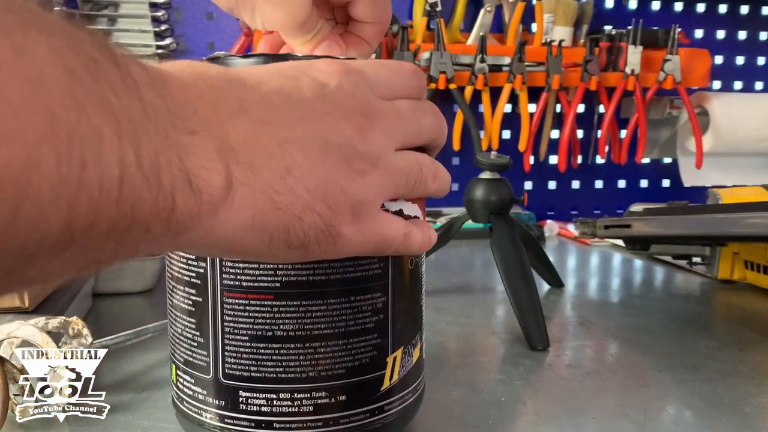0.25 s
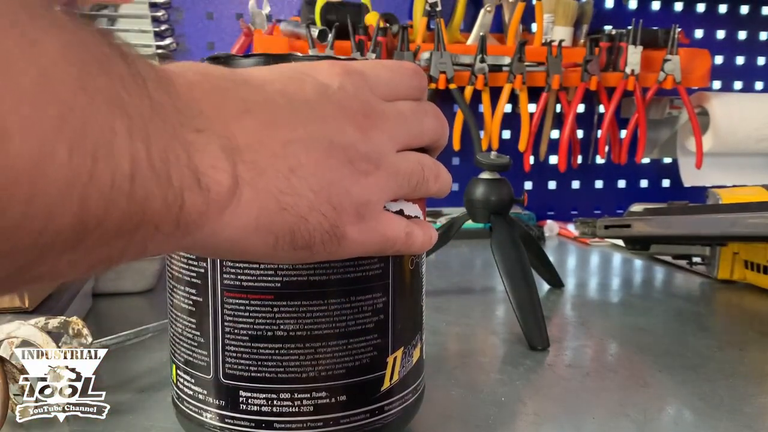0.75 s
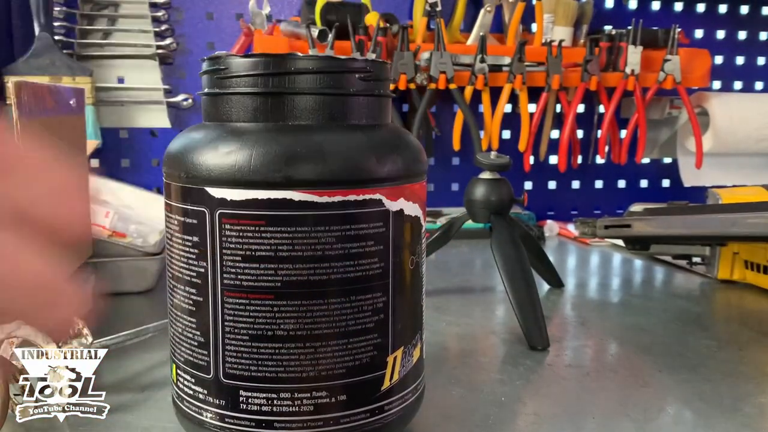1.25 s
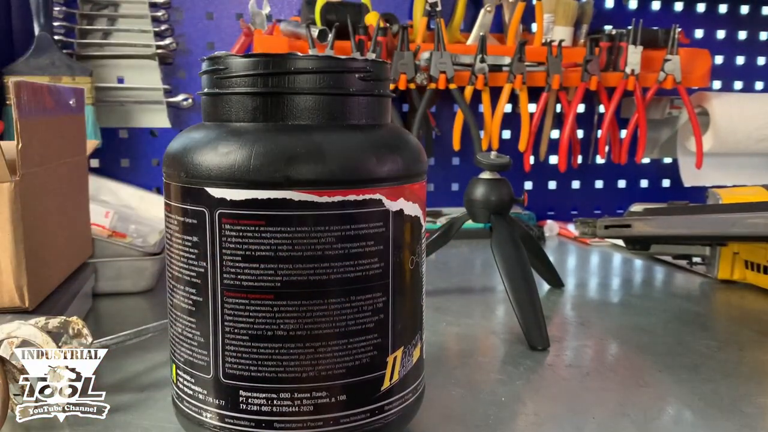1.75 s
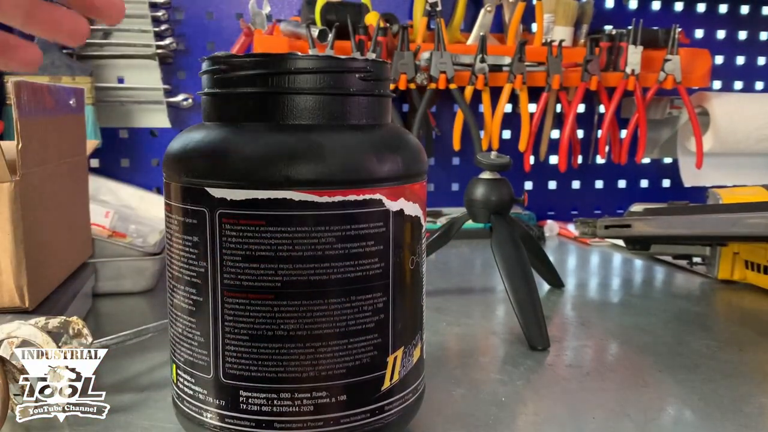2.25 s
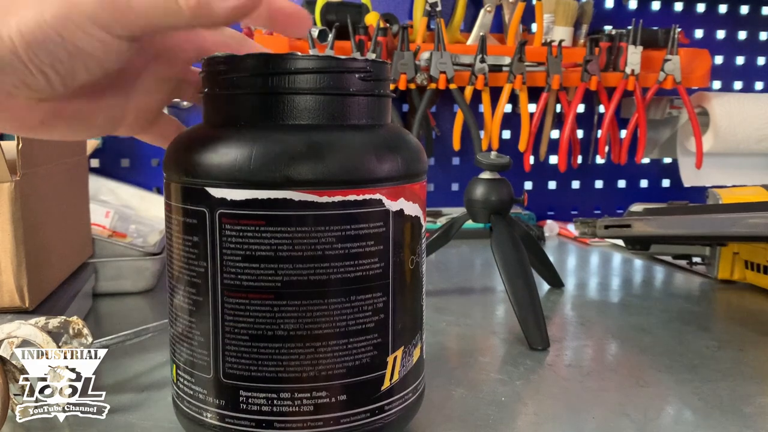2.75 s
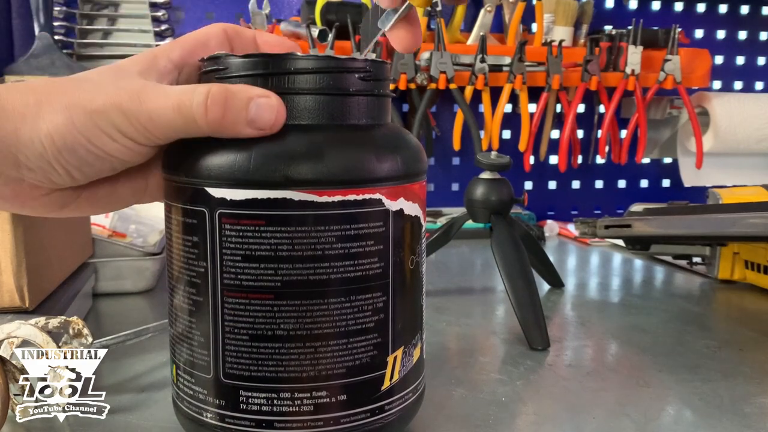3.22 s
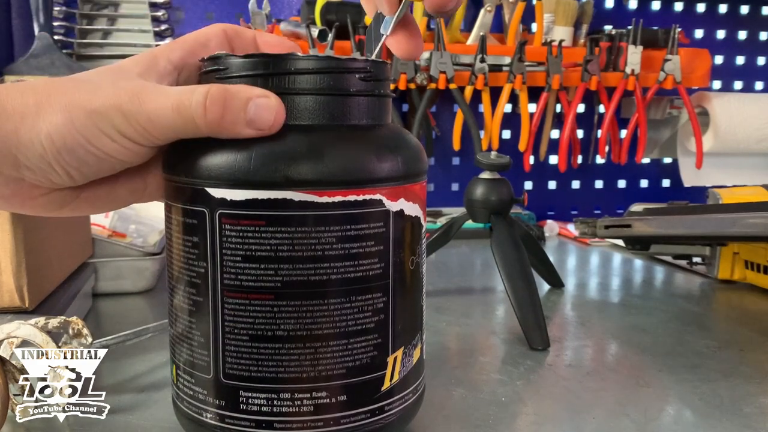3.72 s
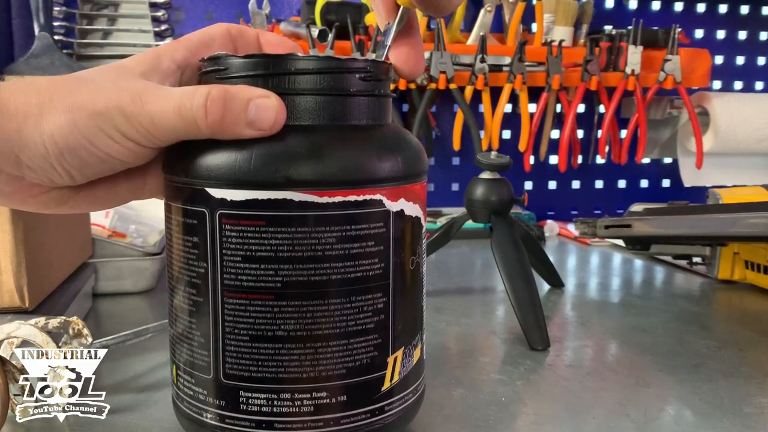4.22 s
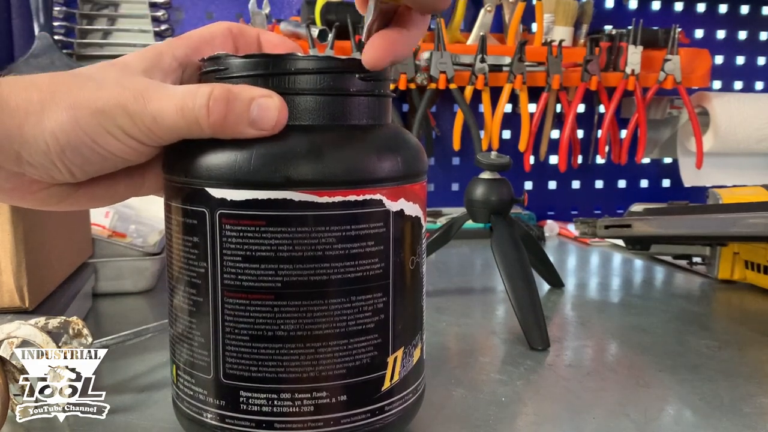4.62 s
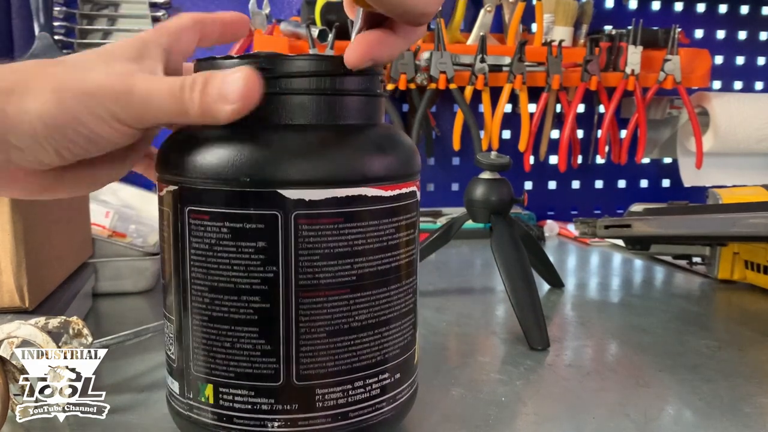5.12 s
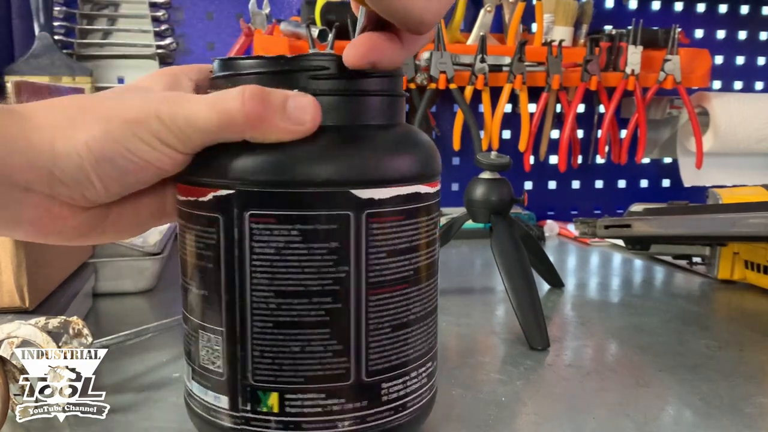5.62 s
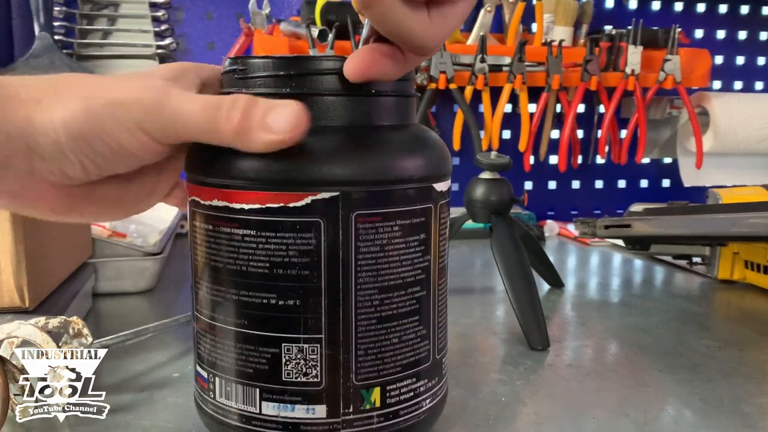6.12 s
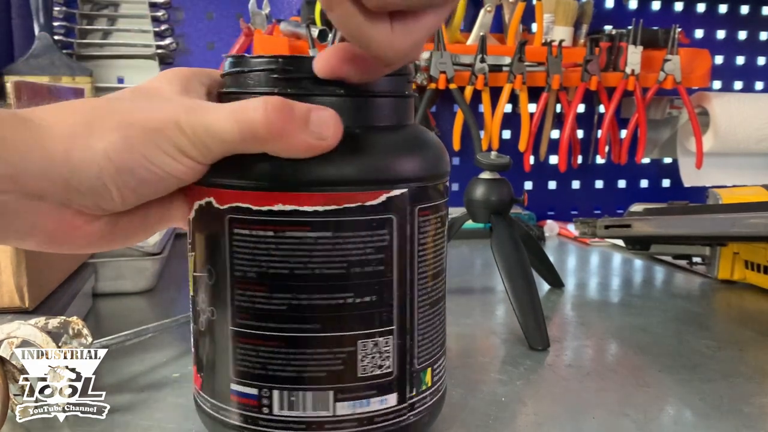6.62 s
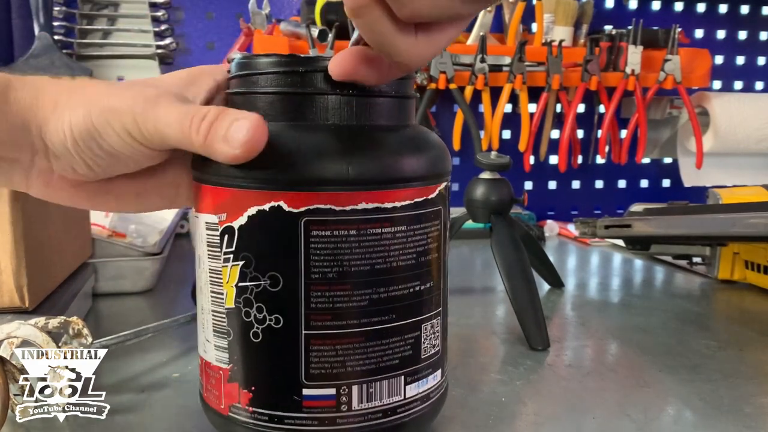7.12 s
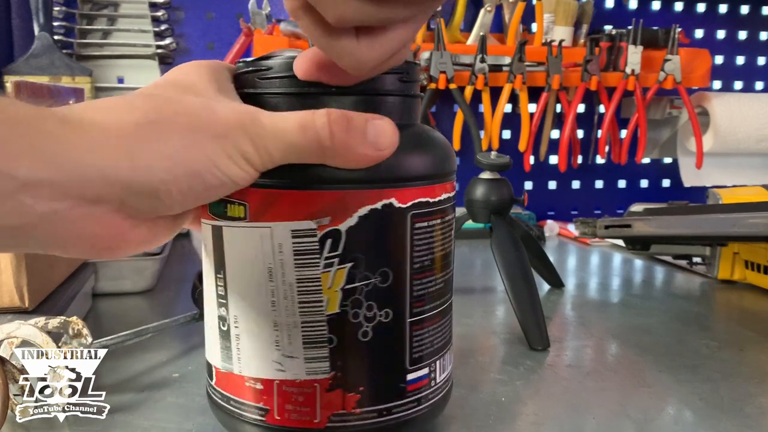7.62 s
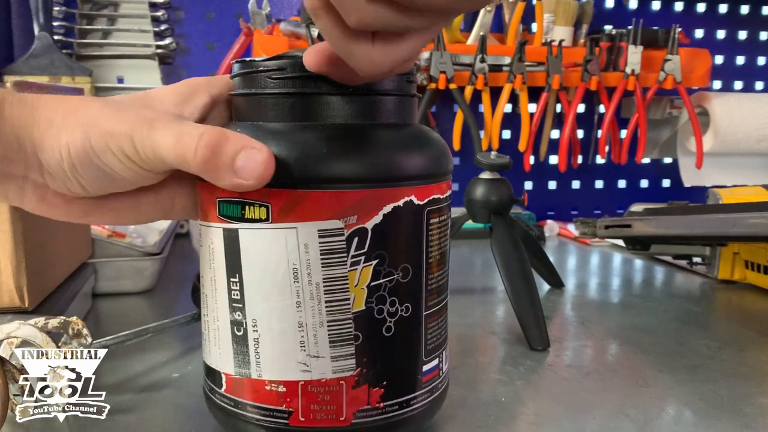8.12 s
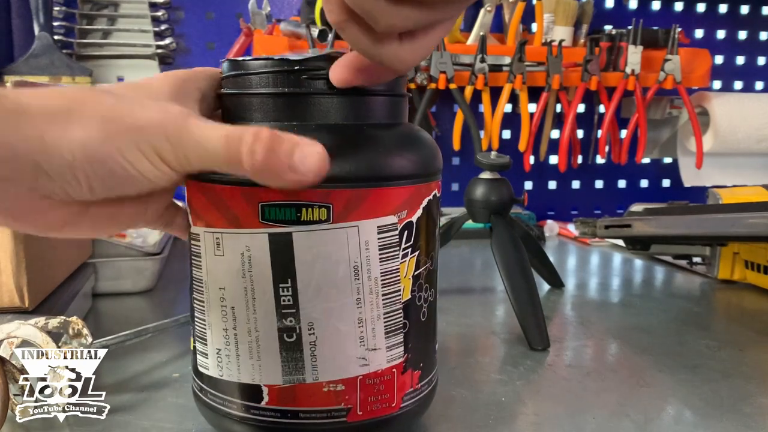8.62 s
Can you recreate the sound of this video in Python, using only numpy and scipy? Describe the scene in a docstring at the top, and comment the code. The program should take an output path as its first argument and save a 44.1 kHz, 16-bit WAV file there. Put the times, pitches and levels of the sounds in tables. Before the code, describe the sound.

Close up in a small workshop, a lid gives two short scraping twists with hollow plastic clacks. After light hand rubbing, a snap-off knife ratchets out in crisp, uneven clicks. The tip taps and pierces a tight foil seal, then drags in crackly, stop-start tears while the empty-sounding jar knocks softly as it turns. Brief room echoes and faint hiss.

```python
"""Opening a sealed plastic jar

In a small workshop, a lid is twisted off a large plastic jar, and a snap-off knife clicks out notch by notch.
The blade pierces the foil seal and is dragged round the rim while the hollow jar knocks as it is turned.
Cuts are clumps of tiny noisy tears, scrapes are shaped noise, and blows and clicks are dying tones with noise.
Echoes, a faint hiss and a low rumble surround them.
"""
import sys
import numpy as np
from scipy import signal
from scipy.fft import rfft, irfft, next_fast_len
from scipy.io import wavfile
from scipy.ndimage import uniform_filter1d

SR = 44100
rng = np.random.default_rng(int(sys.argv[2]) if len(sys.argv) > 2 else 0)


def bounce(signal):
    """Save signal as a 16-bit WAV file at the path given by the first command-line argument."""
    frames = np.transpose(np.atleast_2d(signal))
    limited = np.clip(frames, -1, 1)
    pcm = np.round(limited * 32767).astype(np.int16)
    wavfile.write(sys.argv[1], SR, pcm)


N = 390726  # length in samples
SIZE = next_fast_len(N, True)  # working length, a little longer for fast transforms
TIME, HZ = np.arange(SIZE) / SR, np.fft.rfftfreq(SIZE, 1 / SR)

# Pushes of the blade through the foil. Each row: start in seconds, length in seconds, base level in dB,
# swell from start to end in dB, brightness in dB, extra hollow sound of the jar in dB.
CUTS = [(3.004, 0.11, -54, 1.5, 3.5, -2.5), (3.483, 0.016, -64.5, 15, -4, 24),
        (3.648, .012, -63, 5.5, 1, 0), (3.783, 0.023, -46, 36, 1.5, -1.5),
        (3.817, 0.037, -36, -2, -4.5, 10), (4.026, 0.032, -63.5, -5.5, -7.5, 18),
        (4.153, 0.031, -62, -3, -6.5, 6.5), (4.306, 0.046, -39.5, -14, 0.5, 1),
        (4.38, .049, -57.5, 9, -5, 2), (4.419, 0.052, -45, 0.5, -2.5, -3),
        (4.505, 0.041, -49.5, 17.5, -4, -11), (4.583, 0.081, -53.5, 10, 0, -10),
        (4.652, 0.091, -52, -2, -3, -2), (4.719, 0.1, -44.5, 4, -2, 1.5), (4.841, 0.15, -44, 1, -2.5, 2.5),
        (4.991, 0.12, -60.5, 2, 7, 9), (5.14, .071, -63, -9, -2.5, -4), (5.198, 0.06, -46, -7.5, -4.5, 5),
        (5.328, 0.063, -46.5, 13.5, -4.5, 7), (5.452, .05, -47.5, 9, -1, -5), (5.479, 0.11, -47, -3, -3, 4),
        (5.56, 0.12, -49, -16, -2.5, 3.5), (5.649, 0.11, -41.5, 8.5, -2, -2),
        (5.774, 0.17, -47.5, -15, 0.5, 5), (6.242, 0.11, -63, -16, 1, 10.5), (6.318, 0.1, -47.5, 5, 0, -4),
        (6.43, .06, -41.5, 4.5, -1, -2.5), (6.49, 0.094, -48.5, 0, 1, -1), (6.54, 0.15, -41, 9.5, -2, 2),
        (6.685, 0.097, -42, 1.5, 0, -3), (6.836, 0.063, -54.5, 10, 2, 3), (7.147, 0.027, -51, -6, -1.5, 7),
        (7.239, .076, -48.5, 18, -3, 1), (7.327, 0.067, -42.5, 0, -4.5, 6),
        (7.403, 0.2, -49, 8, -0.5, -1.5), (7.518, 0.11, -41, -2, -2.5, 0.5), (7.621, 0.18, -57, -23, 1, -4),
        (8.072, .09, -51, 14.5, -1.5, 4), (8.147, 0.27, -53, -3, -1, 2), (8.24, 0.1, -62, -11, 9, 6),
        (8.579, .095, -44.5, -13, -1, 5.5), (8.677, .064, -57, -6, -2.5, 8.5), (8.834, .038, -49, 1, -2, 7)]
# Scrapes of the lid round its thread. Each row: start in seconds, length in seconds, base level in dB,
# swell in dB, brightness in dB.
TWISTS = [(0.41, 0.058, -62, 7.5, -1.5), (0.455, 0.11, -47.5, 4, 3.5), (0.5, 0.16, -42.5, 3.5, -1.5),
          (0.92, 0.03, -61.5, 4, 2), (0.965, 0.049, -50.5, 17, -1), (1.005, 0.18, -51.5, -10, -5)]
# Light rubbing of hands and knife. Each row: start in seconds, length in seconds, base level in dB,
# swell in dB, brightness in dB.
RUBS = [(1.418, 0.03, -59.5, -1, -11), (1.449, 0.064, -46.5, -21, 1), (1.56, 0.23, -67.5, -4, -3),
        (1.797, 0.089, -63, -10, 1), (2.2, 0.11, -48.5, -4.5, 7.5), (2.3, 0.16, -49.5, 2.5, -0.5),
        (2.53, 0.06, -57, 0, 3.5), (2.63, 0.15, -62, -8, -7.5), (2.803, 0.099, -57, -2, -11),
        (2.868, 0.11, -57.5, -13.5, 7), (2.93, 0.04, -60.5, -2, -13), (3.035, 0.093, -60.5, -1, -8.5),
        (3.15, 0.039, -65.5, 0, -3.5), (3.21, 0.04, -68, 2.5, 0.5), (5.72, 0.12, -50, 2, -9),
        (5.95, 0.19, -58, 0.5, 2.5), (6.16, 0.066, -57, -4, 2.5), (6.58, 0.17, -53.5, 2, 2),
        (6.92, 0.2, -54.5, 4.5, -2), (7.29, 0.1, -51.5, -1, -3), (8.1, 0.049, -51.5, -2.5, -3),
        (7.79, 0.098, -66.5, -8.5, 4.5), (7.963, 0.051, -62, -2, -0.5)]
# Bands of cuts and scrapes: fizz, rasp, seal, hollow. Each row: lower edge in Hz, upper edge in Hz.
STROKE_BANDS = [(6500, 16000), (1350, 6500), (560, 1350), (110, 560)]
# Colour of the cut. Each row: frequency in Hz, relative level in dB per Hz.
CUT_COLOUR = [(110, -0.5), (190, -2), (270, 6), (370, -4.5), (550, -3), (760, -1.5), (1100, -3),
              (1500, 1.5), (2200, 10.5), (3100, 8), (4400, 2.5), (5600, -7), (6800, -5.5), (8500, -8.5),
              (11000, -13.5), (14000, -12), (16000, -11)]
# Colour of plastic sliding on plastic or skin. Each row: frequency in Hz, relative level in dB per Hz.
SCRAPE_COLOUR = [(110, -1), (270, 3.5), (550, -2), (900, -5.5), (1400, -2.5), (2300, 8), (3100, 6),
                 (4300, 5.5), (5600, -7.5), (6800, -5), (8500, -7), (11000, -13), (14000, -9),
                 (16000, -12.5)]
# The seal's own resonance, shifting as its free edge grows. Each row: time in seconds, frequency in Hz,
# height in dB.
SEAL_RESONANCE = [(4.298, 753, 7), (4.44, 736, 12), (4.7, 722, 11.5), (4.85, 736, 6.5), (4.979, 730, 2.5),
                  (5.35, 820, 6.5), (5.522, 694, 10.5), (5.622, 697, -3), (5.669, 1256, -8.5),
                  (5.75, 1283, 7), (5.83, 1090, 9), (6.199, 1087, 10.5), (6.459, 1044, 10.5),
                  (6.67, 928, 4), (6.801, 990, 4), (7.349, 850, 6.5), (7.6, 1025, 4), (8.141, 976, 4),
                  (8.86, 920, 7.5)]
# How far the bending sheet's resonances come and go. Each row: frequency in Hz, typical change in dB.
FLEX_DB = [(300, 2), (750, 1), (1500, 1.4), (4500, 2), (8000, 1.3)]

# Snaps of foil and plastic. Each row: time in seconds, treble level in dB before the final lift,
# ring of the sheet in dB against the treble before a shift for each band, note of the sheet in Hz.
SNAPS = [(0.535, -52.5, 18, 1700), (0.578, -43, 5, 3360), (0.591, -49.5, 12.5, 1820),
         (0.651, -55, -17, 3970), (0.995, -49.5, -0.5, 3930), (1.009, -57, 12, 2340),
         (1.062, -62, 12, 4060), (1.077, -68, 12, 4000), (1.13, -43.5, -9.5, 8060), (1.441, -70, 16, 2900),
         (1.453, -46, 2.5, 4240), (1.461, -44, 1, 3960), (1.836, -71, 12, 4150), (1.894, -65.5, 7, 2710),
         (2.626, -59.5, -2.5, 4670), (2.631, -44, -3.5, 4480), (2.822, -63, 16.5, 3120),
         (2.87, -49.5, 3, 4520), (2.897, -54, -12, 4260), (2.954, -57, -0.5, 4100), (2.963, -57, -10, 8200),
         (3.03, -50.5, -7, 2380), (3.304, -37.5, -7, 2320), (3.503, -38, -9.5, 2233),
         (3.663, -40.5, -1, 2290), (3.798, -30, -6.5, 1980), (3.812, -51, 12, 2280),
         (3.831, -41.5, -0.5, 2550), (4.273, -46.5, -22, 5200), (4.291, -49, -0.5, 3020),
         (4.309, -35.5, -0.5, 2847), (4.43, -69.5, 12.5, 2630), (4.654, -59, 5, 2760),
         (4.735, -47.5, -13, 2600), (4.933, -48, -13, 2700), (5.218, -49, -4, 2980),
         (5.451, -55, 8.5, 2760), (5.754, -59.5, 7, 1970), (6.598, -55.5, 3.5, 4370),
         (6.673, -42.5, -6, 4100), (6.769, -44.5, 8, 2380), (7.157, -48, -9, 2930), (7.266, -65, 10, 4900),
         (7.338, -51.5, 7.5, 3210), (7.521, -66, 2, 2700), (7.526, -58, 16.5, 2710), (7.609, -48, 2, 4230),
         (7.777, -54.5, 2.5, 2940), (8.135, -61, 0, 4150), (8.25, -49, 1, 4400), (8.376, -46.5, -3, 4150),
         (8.589, -40, 3, 4230), (8.606, -43, -3.5, 3430), (8.624, -52, 0, 3690), (8.665, -55, 1, 2940),
         (8.836, -62, -18, 4000), (8.844, -45.5, -17, 3960)]
# Bands of a snap: crack, low ring, high ring. Each row: lower edge in Hz, upper edge in Hz.
SNAP_BANDS = [(6500, 16000), (1900, 3200), (3200, 6000)]
# Colour of a snap, strongest low in the treble. Each row: frequency in Hz, gain in dB.
SNAP_COLOUR = [(3000, -0.5), (5500, -2), (7000, 2.5), (9000, 1), (11500, -5), (14000, -4)]

# Blows on the jar and its lid. Each row: time in seconds, level in dB before the final lift,
# weight in dB (more bass), hardness in dB (more clatter), note of the struck spot in Hz.
KNOCKS = [(0.298, -64.5, -6, -17, 394), (0.423, -72, 12, -17, 405), (0.46, -56, -26, -17, 464),
          (0.509, -34, -35, 3.5, 402), (0.536, -27, -6, 1.5, 410), (0.558, -32.5, 1.5, -12, 545),
          (0.578, -29, 1, 9.5, 560), (0.591, -36.5, 1.5, 14, 816), (0.607, -45.5, -6, 8, 907),
          (1.007, -22.5, 2.5, 2, 270), (1.02, -41.5, 4.5, 3, 701), (1.035, -52, 16, -6, 300),
          (1.058, -61, 20.5, 2, 213.6), (2.826, -43, -4, -12, 400), (2.939, -51, 2, -11, 330),
          (2.985, -43, -2.5, -6, 415), (3.305, -44, 3, 0, 415), (3.373, -39.5, -4.5, 7.5, 560),
          (3.511, -23, -7.5, -31, 380), (3.664, -39, -12, 2, 455), (3.799, -31.5, -23, -2, 390),
          (3.809, -31, 0.5, 1, 430), (3.835, -48.5, 10.5, 2, 216), (3.885, -22, -7.5, -4.5, 501),
          (4.309, -40.5, 0, 10.5, 795), (4.319, -32.5, 0, -24, 241), (4.933, -54.5, 6, 11.5, 720),
          (4.965, -59.5, 12, -7, 205), (5.002, -45.5, -5, 0, 670), (5.085, -40.5, 1, 1.5, 231),
          (5.209, -56, -6, 13, 770), (5.362, -52.5, 2.5, 8, 700), (5.377, -52, -12, 8, 795),
          (5.452, -53.5, 0, 6.5, 280), (5.493, -54, -15, 6, 760), (5.576, -31.5, -15, -16, 451),
          (5.761, -55.5, -3, 13.5, 1110), (6.031, -70, 8.5, 11, 260), (6.266, -56.5, -1, 6, 264),
          (6.374, -61, 12.5, 15, 231), (6.789, -51, -9, 14, 946), (7.332, -59, 1, 23, 680),
          (7.523, -56.5, 7, 17.5, 230), (7.653, -60, 1, 14.5, 930), (7.774, -54.5, 1, 12.5, 420),
          (8.242, -41.5, -1.5, 3, 420), (8.251, -41.5, -0.5, -1, 274), (8.316, -49.5, -13, 7.5, 900),
          (8.375, -49, -10, 10, 383), (8.549, -65, -5.5, 3.5, 421), (8.589, -32, -30, 1, 414),
          (8.603, -38.5, -5, -2, 576), (8.612, -53, 0, -10, 750), (8.624, -53, 2, 6, 423),
          (8.665, -57.5, -4, 8, 1100), (8.754, -56.5, -9, 4, 315)]
# Bands of a blow: body, thud, hollow, wall, edge. Each row: lower edge in Hz, upper edge in Hz.
KNOCK_BANDS = [(330, 600), (55, 115), (160, 300), (600, 1200), (1200, 3000)]
# Tones of the hollow jar. Each row: frequency in Hz, relative level in dB, seconds to fall by 60 dB.
JAR_MODES = [(95, -7.5, 0.098), (151.7, -12, 0.18), (205, -9, 0.031), (257, -3, 0.036), (330, -1.5, 0.042),
             (415, 1.5, 0.059), (552, 0.5, 0.054), (608, 0, 0.046), (670, -0.5, 0.036), (771.6, -2, 0.1),
             (806, -9.5, 0.053), (942, -9.5, 0.18), (1101, -8.5, 0.11), (1530, -15, .1), (1902, -13, 0.12),
             (2014, -13, .1), (2320, -13.5, 0.14)]
# Band levels of an ordinary blow, in dB against the jar's body band
THUD_DB, HOLLOW_DB, WALL_DB, EDGE_DB = -14.5, -1, -6, -13
# How strongly the outermost bands answer, in dB per dB
THUD_PER_WEIGHT, EDGE_PER_HARDNESS = 1.8, 0.82

# The knife's slider jumping its notches. Each row: time in seconds, treble level in dB before the final lift.
RATCHET = [(2.085, -60), (2.109, -63.5), (2.121, -63.5), (2.153, -45), (2.198, -29.5), (2.24, -59),
           (2.263, -23.5), (2.287, -36), (2.339, -41), (2.393, -25)]
# Bands of a tick: crack, low ring, high ring, handle, case. Each row: lower edge in Hz, upper edge in Hz.
RATCHET_BANDS = [(5600, 16000), (2300, 3200), (3400, 4400), (170, 520), (520, 2000)]
# Tones of the knife. Each row: frequency in Hz, relative level in dB, seconds to fall by 60 dB.
KNIFE_MODES = [(2150, -8, .025), (2690, -3, .025), (3820, 0, .014), (4300, -2, .02), (4960, -9, .02),
               (8310, -4, .025), (8660, -1, .02), (9900, -6, .02), (14050, -6, .02)]
# Tones of the slider's spring. Each row: frequency in Hz, relative level in dB, seconds to fall by 60 dB.
SPRING_MODES = [(2880, -3, .016), (3800, 0, .016), (4150, -3, .012), (5600, -10, .01)]
SPRING_PER_LIGHTNESS = .75  # the lighter a tick, the more spring it holds, in dB per dB
# Chatter of the blade as its tip slips on the seal. Each row: time in seconds, level in dB, pitch in Hz.
TWANGS = [(3.372, -60.5, 3260), (3.374, -56, 2020), (3.507, -73, 2400), (3.514, -58, 3550)]

# Left-to-right balance. Each row: frequency in Hz, left minus right in dB.
BALANCE = [(100, 0), (380, 0.5), (700, 4), (1290, 3.5), (2380, 6.5), (4400, -8), (6500, 4), (8000, -6)]
# How long the room rings. Each row: frequency in Hz, seconds to fall by 60 dB.
ROOM_T60 = [(100, 0.049), (300, 0.26), (800, 0.12), (2000, 0.22), (5000, 0.2), (13000, 0.013)]
# Loudness of the echoes. Each row: frequency in Hz, gain in dB on what is sent to the room.
ROOM_DB = [(100, -5.5), (400, -8), (1200, -7), (4000, -5), (9000, -2.5), (16000, -9.5)]
# Colour of the workshop's hiss. Each row: frequency in Hz, relative level in dB per Hz.
HUSH_COLOUR = [(25, -20.5), (50, -4), (90, -1.5), (150, -9), (300, -12.5), (700, -19), (1400, -24),
               (4000, -26.5), (6000, -28.5), (9000, -25.5), (16000, -29.5)]
HUSH_DB = -64.5  # level of the hiss
# Low rumble. Each row: time in seconds, level in dB.
RUMBLE = [(0, -59), (0.9, -64), (1.1, -49), (1.4, -65), (2.2, -72), (3.2, -74), (8.86, -90.5)]
EDGE_HZ = 15950  # upper limit of the sound


def cutting(rub_db=-4, slip_db=1.0, slip_hz=70, jar_db=-10, fizz_db=-4.5, rasp_db=-5.0, seal_db=-6, hollow_db=-9.5):
    """The edge sticks and slips, so clumps of tiny tears fizz and rasp, ring the seal and shake the jar."""
    tears_per_s, size_db, crackle_db = 4000, 3.1, -1
    heights = np.minimum(rng.exponential(1, SIZE), 4.5)
    sizes = amp(size_db * heights) * rng.choice([-1, 1], SIZE)
    tears = unit(sizes * (rng.random(SIZE) < tears_per_s / SR))
    rubbed = tears + amp(rub_db) * rng.standard_normal(SIZE)
    fine = rubbed * amp(slip_db * wander(slip_hz))
    jerks = amp(1.5 * wander(70))
    drive = flexing((fine + amp(crackle_db) * crackles()) * jerks)
    sheet = colour(drive, CUT_COLOUR)
    jar = signal.oaconvolve(drive, ring(JAR_MODES, TIME[:8192], spread_db=0, detune=0))[:SIZE]
    sources = [colour(fine, CUT_COLOUR), sheet, sheet, sheet]
    fizz, rasp, seal, hollow = (unit(band(x, edges, order=4)) for x, edges in zip(sources, STROKE_BANDS))
    hollow = unit(hollow + amp(jar_db) * unit(jar))
    rows = []
    for s, length, db, swell, bright, body in CUTS:
        offsets = np.array([fizz_db + bright, rasp_db, seal_db - bright, hollow_db + body])
        rows.append((s, length, swell, db + offsets))
    gains = pressure(rows, attack_s=0.0026, ease=0.052, release_t60=.16, arch_db=4.5)
    return (np.array([fizz, rasp, seal, hollow]) * gains).sum(0)


def crackles(low_hz=2000, high_hz=6500, count=14):
    """Larger tears, hundreds a second, each ring a crease of its own pitch for a few cycles."""
    per_s, spread_db, cycles = 480, 4.3, 2.5
    sizes = amp(spread_db * np.minimum(rng.exponential(1, SIZE), 3))
    sizes = sizes * (rng.random(SIZE) < per_s / SR)
    crease, t = rng.integers(0, count, SIZE), TIME[:512]
    out = np.zeros(SIZE)
    for k, hz in enumerate(np.linspace(low_hz, high_hz, count)):
        grain = unit(np.sin(2 * np.pi * hz * t) * np.exp(-t * hz / cycles))
        out += signal.oaconvolve(sizes * (crease == k), grain)[:SIZE]
    return unit(out)


def flexing(x, octaves=0.34):
    """The sheet bends as it tears: patches of resonance come and go along with the seal's main one."""
    hz, t, z = signal.stft(x, SR, nperseg=1024, noverlap=768)
    chance = uniform_filter1d(rng.standard_normal((160, len(t))), 3, 0)
    chance = uniform_filter1d(chance, 10, 1)
    # the square root makes patches wider at higher pitches
    patches_db = read(FLEX_DB, hz)[:, None] * unit(chance)[np.sqrt(hz).astype(int)]
    s, seal_hz, seal_db = np.transpose(SEAL_RESONANCE)
    away = np.log2((hz[:, None] + 1) / np.interp(t, s, seal_hz)) / octaves
    gain = amp(patches_db + np.interp(t, s, seal_db) * np.exp(-away ** 2 / 2))
    return signal.istft(z * gain, SR, nperseg=1024, noverlap=768)[1][:SIZE]


def pressure(rows, attack_s, ease, release_t60, arch_db):
    """Pressing sets each band's gain: a stroke eases in, swells or sinks along an arch, and lets go."""
    power, t = np.zeros((len(STROKE_BANDS), SIZE)), TIME[:SR // 2]
    for s, length, swell_db, bands_db in rows:
        along = np.minimum(t / length, 1) - .5
        release_db = 60 * np.maximum(t - length, 0) / release_t60
        shape_db = swell_db * along - arch_db * (2 * along) ** 2 - release_db
        gain = np.minimum(t / (attack_s + ease * length), 1) * amp(shape_db)
        for layer, db in zip(power, bands_db):
            add(layer, s, (gain * amp(db)) ** 2)
    return np.sqrt(power)


def snaps(level_db=1, after_db=-13, rise=0.0019, crack_t60=0.0045, low_ring_db=2, high_ring_db=-3.5,
          note_db=-9, note_t60=0.04):
    """Foil gives way in a crack of a few milliseconds, and the sheet rings and shivers after it."""
    out, t = np.zeros(SIZE), TIME[:4096]
    for s, db, ring_db, hz in SNAPS:
        crack = burst(t, rise, crack_t60)
        shiver = amp(after_db) * burst(t, rise, t60=0.094)
        sound = crack + shiver + amp(note_db) * note(t, hz, note_t60)
        levels = [db, ring_db + low_ring_db, ring_db + high_ring_db]
        add(out, s - .0005, voiced(sound, levels, SNAP_BANDS))
    return amp(level_db) * colour(out, SNAP_COLOUR)


def knocks(level_db=1, modes_db=-11.0, spot_db=-13, spot_t60=0.022, wall_db=-8, rise=0.00063, push_t60=0.018):
    """The struck spot and the jar's tones ring over the dense, short clatter of its wall."""
    out, t = np.zeros(SIZE), TIME[:8192]
    wall_t60 = .034
    for s, *blow, spot_hz in KNOCKS:
        modes = amp(modes_db) * unit(ring(JAR_MODES, t, spread_db=3.5, detune=.02))
        modes = modes + amp(spot_db) * note(t, spot_hz, spot_t60)
        clatter = amp(wall_db) * burst(t, rise, wall_t60)
        push = burst(t, rise=0.0004, t60=push_t60)
        sound = modes * (1 - np.exp(-t / rise)) + clatter + push
        add(out, s - .0005, voiced(sound, knock_levels(*blow), KNOCK_BANDS))
    return amp(level_db) * out


def knock_levels(level, weight, hardness):
    """Band levels of a blow: a heavy one moves the hollow jar, a hard one rattles its wall."""
    thud = THUD_DB + THUD_PER_WEIGHT * weight
    edge = EDGE_DB + EDGE_PER_HARDNESS * hardness
    return [level, thud, HOLLOW_DB + weight, WALL_DB + hardness, edge]


def ratchet(level_db=1, rattle_db=-9, climb_db=-19, thump_db=-19, thump_hz=95, ring_db=-12, spring_db=-24):
    """The slider's spring climbs a tooth and drops into a notch; the blade rings and the handle thumps."""
    out, t = np.zeros(SIZE), TIME[:4096]
    hardest_db = max(row[1] for row in RATCHET)
    for s, db in RATCHET:
        lighter_db = hardest_db - db
        levels = tick_levels(db, lighter_db)
        sound = burst(t, rise=0.0013, t60=.008) + amp(rattle_db) * burst(t, rise=0.0014, t60=0.063)
        blade = unit(ring(KNIFE_MODES, t, spread_db=4, detune=.025))
        spring = unit(ring(SPRING_MODES, t, spread_db=2, detune=.02))
        spring_gain = amp(spring_db + SPRING_PER_LIGHTNESS * lighter_db)
        sound = sound + amp(ring_db) * blade + spring_gain * spring
        thump = amp(db + thump_db - 60 * t / 0.11) * np.sin(2 * np.pi * thump_hz * t)
        add(out, s - .0005, voiced(sound, levels, RATCHET_BANDS) + thump)
        # the climb is a burst played backwards, ending at the drop
        climb = voiced(burst(t, rise=.0005, t60=0.014), levels, RATCHET_BANDS)[::-1]
        add(out, s - t[-1], amp(climb_db) * climb)
    return amp(level_db) * out


def tick_levels(db, lighter_db, low_db=-4, high_db=-4, handle_db=-23, case_db=-20,
                low_slope=0.42, high_slope=0.47, handle_slope=0.068):
    """Band levels of a tick: the lighter it is, the more of it is ring and the less is crack."""
    return [db, low_db + low_slope * lighter_db, high_db + high_slope * lighter_db,
            handle_db + handle_slope * lighter_db, case_db + handle_slope * lighter_db]


def twangs(rise=.014, t60=0.07, width=0.053):
    """The freed blade swings up and buzzes briefly against the foil, in a rough band round its pitch."""
    out, t = np.zeros(SIZE), TIME[:8192]
    for s, db, hz in TWANGS:
        edges = (hz / (1 + width), hz * (1 + width))
        add(out, s, amp(db) * unit(band(burst(t, rise, t60), edges, order=2)))
    return out


def scraping(slip_db=1.5, slip_hz=120, rasp_db=-4, lid_fizz_db=-3.0, lid_mid_db=-3, lid_low_db=-2,
             rub_fizz_db=2, rub_mid_db=-22, rub_low_db=-34):
    """Lid thread and hands slide with a dense, even grain; only the lid is strong in the low bands."""
    grain = colour(rng.standard_normal(SIZE) * amp(slip_db * wander(slip_hz)), SCRAPE_COLOUR)
    layers = np.array([unit(band(grain, edges, order=4)) for edges in STROKE_BANDS])

    def tilted(table, fizz_db, mid_db, low_db):
        """A bright stroke fizzes more and drones less."""
        rows = []
        for s, length, db, swell, bright in table:
            offsets = np.array([fizz_db + bright, rasp_db, mid_db - bright, low_db - bright])
            rows.append((s, length, swell, db + offsets))
        return rows

    lid_rows = tilted(TWISTS, lid_fizz_db, lid_mid_db, lid_low_db)
    rub_rows = tilted(RUBS, rub_fizz_db, rub_mid_db, rub_low_db)
    twists = pressure(lid_rows, attack_s=0.0097, ease=.02, release_t60=0.13, arch_db=9)
    rubs = pressure(rub_rows, attack_s=.0037, ease=0.058, release_t60=0.085, arch_db=3.0)
    return (layers * np.hypot(twists, rubs)).sum(0)


def ports(x, lead_ms=0.18):
    """The jar stands a little left: the left port hears it first, and the body between shades each side."""
    tilt_db = read(BALANCE, HZ) / 2
    late = np.exp(-2j * np.pi * HZ * lead_ms / 1000)
    return irfft(rfft(x) * np.array([amp(tilt_db), amp(-tilt_db) * late]), SIZE)


def room(x, count=4):
    """Hands move and the jar turns, so one pattern of echoes gives way to the next, in a repeating cycle."""
    cycle_s = .9
    phase = TIME / cycle_s - np.arange(count)[:, None] / count
    turns = np.maximum(np.cos(2 * np.pi * phase), 0)
    wet = sum(signal.oaconvolve((x * turn)[None], echoes(), axes=1)[:, :SIZE] for turn in turns)
    return diffuse(colour(wet, ROOM_DB))


def echoes(early_db=3, early_s=0.01):
    """Bench and tool wall answer early; the workshop adds a short tail of fading noise."""
    hz, t, z = signal.stft(rng.standard_normal((2, SR // 3)), SR, nperseg=256)
    decay = amp(-60 * t / read(ROOM_T60, hz)[:, None]) * (1 + amp(early_db) * np.exp(-t / early_s))
    decay = decay / np.sqrt(np.mean(decay ** 2, axis=1, keepdims=True))
    tail = signal.istft(z * decay, SR, nperseg=256)[1]
    build_s = .002
    tail = tail * (1 - np.exp(-(TIME[:tail.shape[1]] / build_s) ** 2))
    return tail / np.linalg.norm(tail, axis=1, keepdims=True)


def diffuse(pair, shared_hz=450):
    """Sound from all sides: the two ports share the bass and part ways above it."""
    a, b = rfft(pair)
    same = .97 / (1 + (HZ / shared_hz) ** 2)
    return irfft(np.array([a, same * a + np.sqrt(1 - same ** 2) * b]), SIZE)


def background(rumble_hz=52):
    """Faint hiss of the workshop over a low rumble that swells briefly early on, then fades away."""
    hush = unit(diffuse(colour(rng.standard_normal((2, SIZE)), HUSH_COLOUR)))
    rumble_edges = (rumble_hz * 0.89, rumble_hz * 0.98)
    rumble = unit(band(rng.standard_normal(SIZE), rumble_edges, order=2))
    return amp(HUSH_DB) * hush + rumble * amp(np.interp(TIME, *np.transpose(RUMBLE)))


def ring(modes, t, spread_db, detune):
    """Dying tones; each blow lands elsewhere, so it weights and tunes them anew."""
    hz, db, t60 = np.transpose(modes)[:, :, None]
    weight, shift = rng.standard_normal((2, len(modes), 1))
    level = amp(db + spread_db * weight - 60 * t / t60)
    return (level * np.sin(2 * np.pi * hz * (1 + detune * shift) * t)).sum(0)


def note(t, hz, t60):
    """One dying tone with an rms (average strength) of one."""
    return unit(np.sin(2 * np.pi * hz * t) * amp(-60 * t / t60))


def burst(t, rise, t60):
    """A crowd of tiny fractures or wall tones, made as noise that swells and dies."""
    return unit(rng.standard_normal(len(t)) * (1 - np.exp(-t / rise)) * amp(-60 * t / t60))


def voiced(sound, levels, bands):
    """Sets the energy of a blow band by band, as an rms over 20 ms; later levels are against the first."""
    gains = amp(levels[0]) * amp(np.r_[0, levels[1:]])
    spectrum, hz = rfft(sound), np.fft.rfftfreq(len(sound), 1 / SR) + 1
    shares = [1 / (1 + (lo / hz) ** 9 + (hz / hi) ** 9) for lo, hi in bands]
    power = sum(g ** 2 * share / np.sum(share * abs(spectrum) ** 2) for g, share in zip(gains, shares))
    log_gain = np.log(power / power.max() + 1e-7) / 2
    # this phase keeps the filter from sounding ahead of the blow
    causal = np.exp(signal.hilbert(np.r_[log_gain, log_gain[-2:0:-1]]).conj())[:len(hz)]
    window = .02 * SR
    return unit(irfft(spectrum * causal)) * np.linalg.norm(gains) * np.sqrt(window / len(sound))


def wander(rate_hz):
    """Smooth chance with an rms of one."""
    return unit(irfft(rfft(rng.standard_normal(SIZE)) / (1 + (HZ / rate_hz) ** 4), SIZE))


def colour(x, points):
    """Filters a full-length sound with a smooth frequency curve."""
    return irfft(rfft(x) * amp(read(points, HZ)), SIZE)


def band(x, edges, order=3):
    """Keeps the sound between two frequencies, without looking ahead in time."""
    return signal.sosfilt(signal.butter(order, edges, "bandpass", fs=SR, output="sos"), x)


def read(points, hz):
    """Reads a table along a logarithmic frequency axis."""
    f, value = np.transpose(points)
    return np.interp(np.log(hz + 1), np.log(f), value)


def amp(db):
    """Turns decibels into gain."""
    return 10 ** (np.asarray(db) / 20)


def unit(x):
    """Scales to an rms of one."""
    return x / np.sqrt(np.mean(x ** 2) + 1e-20)


def add(mix, s, sound):
    """Lays a sound into the mix at a time in seconds."""
    part = mix[max(round(s * SR), 0):][:len(sound)]
    part += sound[:len(part)]


def scene(clicks_room_db=-2):
    """The jar radiates all round; the clicks arrive more directly, with less echo."""
    jar = knocks() + cutting() + scraping()
    clicks = snaps() + ratchet() + twangs()
    direct = ports(jar + clicks)
    reflected = room(jar + amp(clicks_room_db) * clicks)
    return (direct + reflected + background())[:, :N]


def record(dry):
    """In the treble both channels carry one signal, the left a moment late; then the top is cut off."""
    split_hz, lag_s = 6300, .000214
    left, right = rfft(dry, SIZE)
    treble = 1 / (1 + (split_hz / (HZ + 1)) ** 24)
    late_right = right * np.exp(-2j * np.pi * HZ * lag_s)
    left = np.sqrt(1 - treble) * left + np.sqrt(treble) * late_right
    low_pass = signal.firwin(401, EDGE_HZ, window=("kaiser", 8), fs=SR)
    return signal.oaconvolve(irfft(np.array([left, right]), SIZE)[:, :N], low_pass[None], "same")


dry = scene()
out = record(dry)
bounce(out)
```